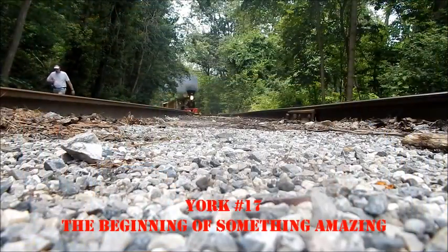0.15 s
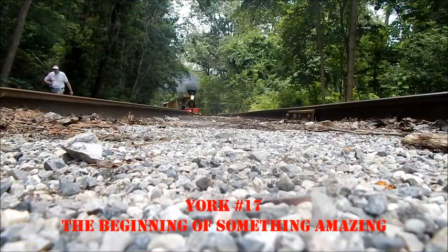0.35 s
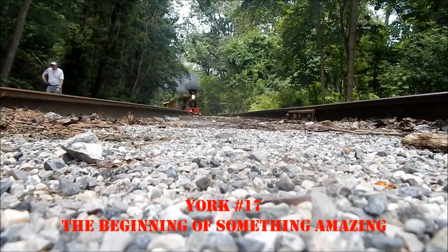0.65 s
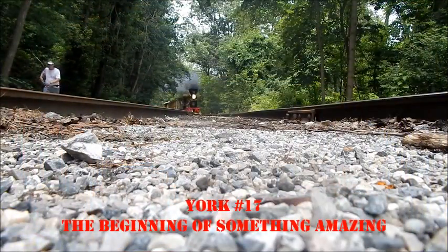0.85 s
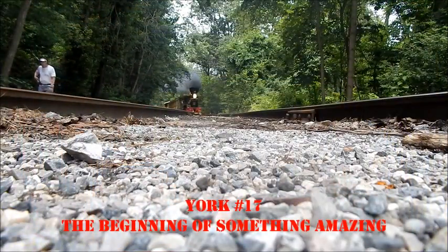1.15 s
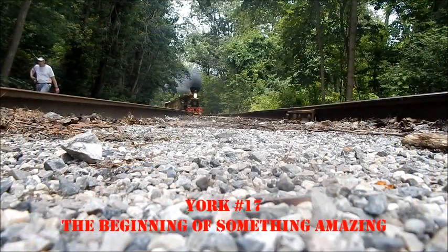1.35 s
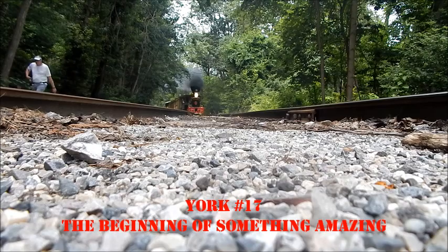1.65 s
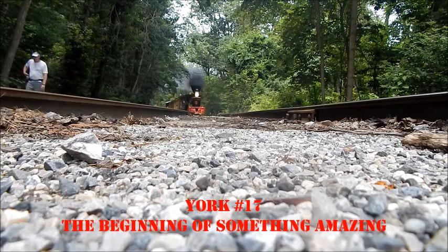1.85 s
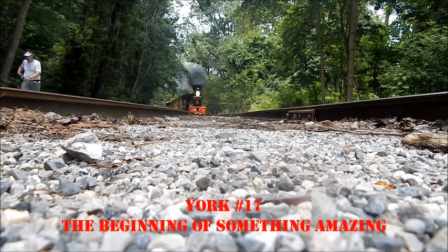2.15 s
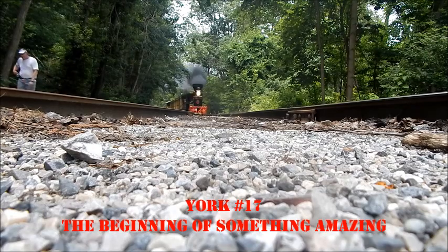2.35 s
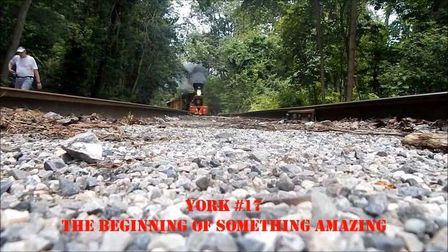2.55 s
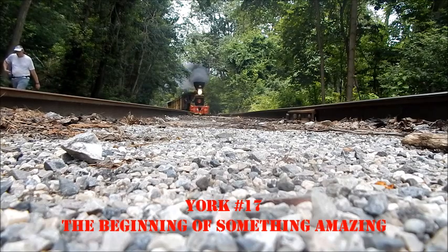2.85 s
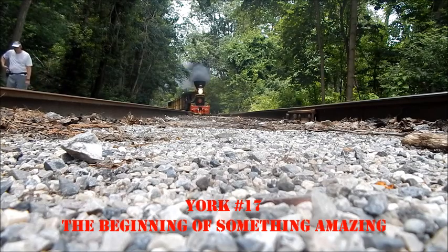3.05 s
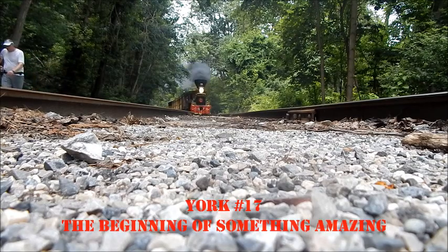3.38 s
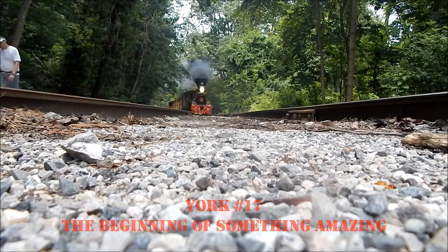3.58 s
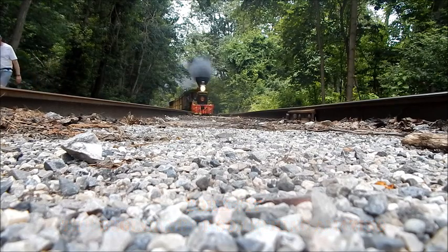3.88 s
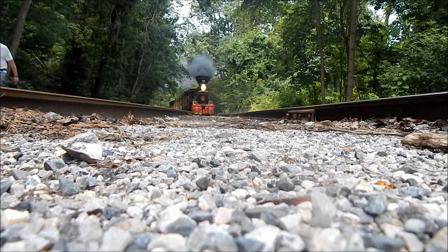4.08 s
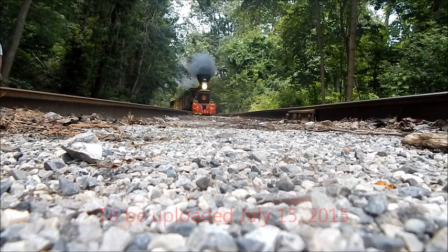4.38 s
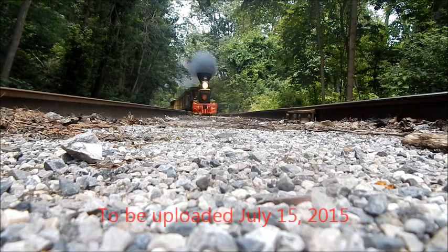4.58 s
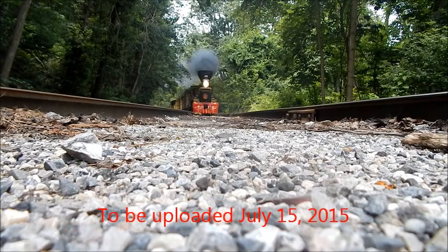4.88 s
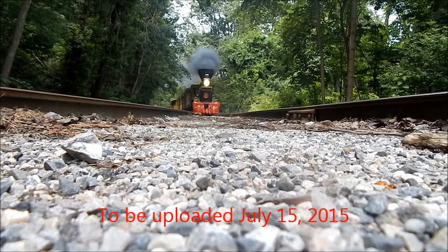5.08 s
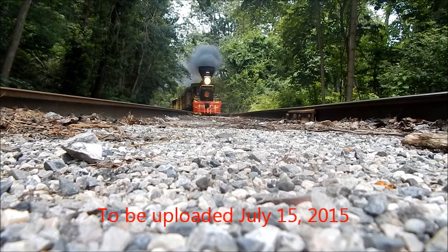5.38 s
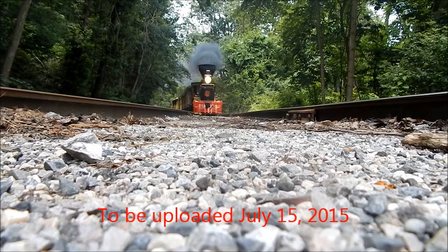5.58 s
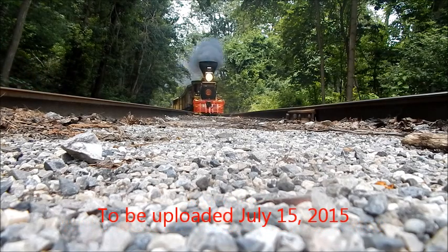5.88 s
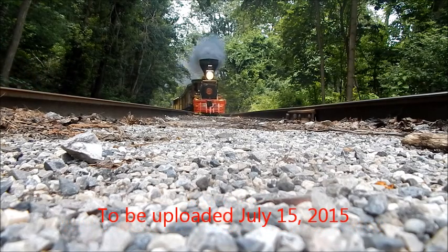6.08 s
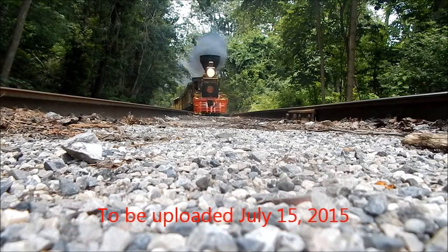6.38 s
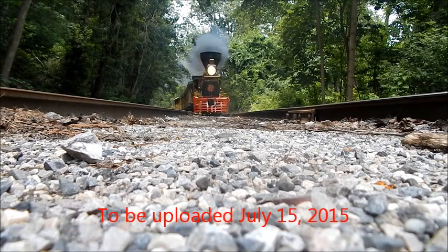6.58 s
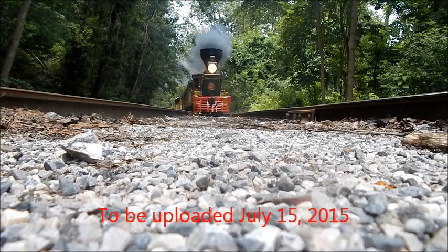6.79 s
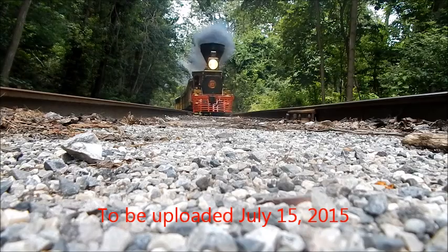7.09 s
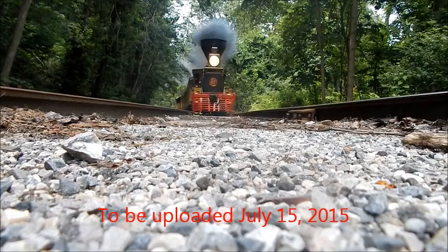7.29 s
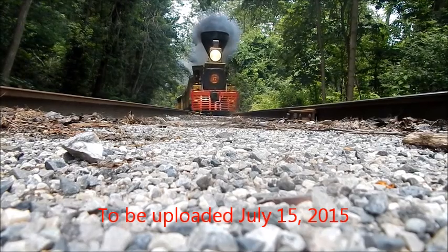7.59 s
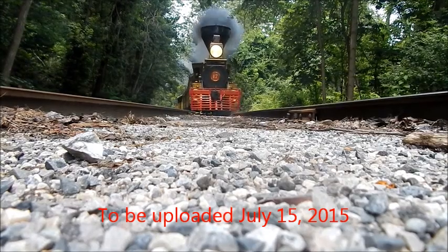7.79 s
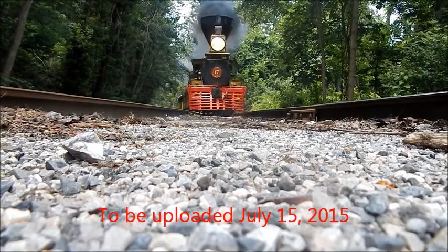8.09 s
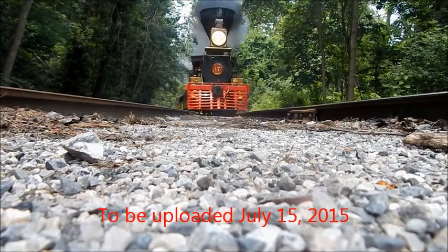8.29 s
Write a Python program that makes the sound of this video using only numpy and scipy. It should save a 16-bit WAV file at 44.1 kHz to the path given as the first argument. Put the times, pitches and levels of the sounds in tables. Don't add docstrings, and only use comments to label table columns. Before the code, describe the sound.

A steam locomotive whistle blows two long, wavering hollow blasts through woods, with steam hiss, a tolling bell and wind buffeting the microphone between them.

```python
import sys
import numpy as np
from scipy import signal
from scipy.io import wavfile
from scipy.ndimage import uniform_filter1d

SR = 44100
rng = np.random.default_rng(int(sys.argv[2]) if len(sys.argv) > 2 else 0)


def invert_db(x):
    u = np.asarray(x, float) / 20
    return 10 ** u


def file_out(sig):
    cols = np.atleast_2d(sig).T
    lim = np.clip(cols, -1, 1)
    pcm = np.round(lim * 32767).astype(np.int16)
    wavfile.write(sys.argv[1], SR, pcm)


N = 372204

# time in seconds, pitch in Hz, first mode in dB.
WHISTLE_PIPE = [(0, 400, -12), (.33, 398, -9.5), (.5, 408.8, -10), (1.6, 413.1, -10.5),
                (2.65, 418.8, -12.5), (2.85, 405, -14.5), (2.96, 429.2, -9.5), (3.1, 415.5, -17),
                (3.37, 388.7, -17.5), (3.44, 414.1, -21), (5.03, 408.5, -32), (5.045, 369.4, -18),
                (5.08, 385.3, -9.5), (5.17, 393, -8.5), (5.21, 413.4, -8.5), (6.3, 417.6, -12),
                (6.6, 413, -12.5), (8.44, 412.7, -19.5)]
# time in seconds, flow as hiss in dB, overblowing as third mode in dB.
VALVE_STEAM = [(0, -52.5, -25.5), (.6, -50.5, -25.5), (1.15, -50.5, -24), (1.9, -53, -27),
               (2.58, -51.5, -22), (2.72, -51.5, -30.5), (2.93, -47, -23.5), (3.1, -48, -26),
               (3.4, -59, -33.5), (4.1, -64, -39.5), (4.95, -57, -50), (5.07, -44, -29.5),
               (5.22, -50.5, -36), (5.35, -52, -25.5), (6.1, -47, -18.5), (6.35, -48, -23.5),
               (6.55, -55, -25), (8.44, -56.5, -30.5)]
# time in seconds, share 0-1.
TREE_SCATTER = [(0, 0.36), (1, 0.25), (2.75, 0.25), (3, 0.39), (3.38, 0.6), (3.5, 1.4), (5.03, 0.8),
                (5.05, .05), (5.5, 0.22), (8.44, 0.15)]
# centre in seconds, width in seconds, depth 0-1.
ECHO_NULLS = [(.098, .014, 0.87), (.27, 0.012, 0.88), (.34, 0.02, 0.85), (0.396, 0.038, 0.96),
              (0.479, 0.022, 0.67), (.66, 0.012, 0.3), (.88, 0.013, 0.8), (.95, 0.011, 0.65),
              (1.022, 0.018, .45), (1.133, 0.016, 0.5), (1.666, 0.024, 0), (1.85, 0.011, 0.23),
              (1.955, 0.022, 0.18), (2.296, 0.021, 0.88), (2.384, .015, 0.83), (2.646, 0.024, 0.43),
              (2.777, 0.0062, 0.5), (2.936, 0.011, 0.87), (3.325, 0.019, 0.7), (3.41, 0.049, 0.92),
              (5.498, 0.037, 0.55), (5.586, 0.029, 0.68), (5.887, 0.045, 0.92), (6.116, 0.024, 0.64),
              (6.562, 0.024, 0.66), (6.718, 0.017, 0.67), (6.796, 0.026, .65), (7.442, 0.033, 0.79),
              (7.555, 0.016, .62), (8.035, 0.035, 0.55)]
# centre in seconds, width in seconds, rise in dB (negative: dip).
ECHO_SWELLS = [(.445, 0.025, 4), (.62, 0.018, 3.5), (1.2, 0.072, 1), (1.42, 0.14, -6), (1.6, 0.029, 9),
               (1.74, 0.047, 3.5), (3.82, 0.06, 8.5), (3.98, 0.021, 8), (4.35, 0.057, 7),
               (4.624, 0.01, 9.5), (5.43, 0.032, 2), (5.71, 0.021, 5), (6.26, 0.034, 2), (6.51, 0.015, 2.5),
               (7.02, .1, 1), (7.39, 0.019, 5), (8.3, 0.054, -1), (3.27, 0.021, 1), (3.5, 0.024, 2.5),
               (3.58, 0.034, 5), (3.72, 0.069, -6), (4.15, 0.085, 5), (2.08, 0.015, -4), (2.03, 0.037, 3),
               (2.72, 0.032, 2), (7.64, 0.014, -3.5), (.79, .04, -4), (6.2, 0.011, -6), (6.45, 0.026, -3.5),
               (8.43, .03, -14)]
# centre in seconds, width in seconds, rise in dB.
SECOND_FLARE = [
    (5.31, 0.098, 13),
]
# centre in seconds, width in seconds, rise in dB.
FIFTH_SETTLING = [
    (2.85, 0.071, 6),
    (5.13, .1, -15),
    (6.75, 0.32, -1.5),
]
# multiple of the pitch, level in dB.
UPPER_PARTIALS = [(5, 3.5), (6, -5.5), (7, -6.5), (8, -11.5), (9, -16.5), (10, -19.5), (11, -22.5)]

# frequency in Hz, density in dB per Hz.
WIND_SPECTRUM = [(20, -8.5), (60, -2), (145, -0.5), (200, -5.5), (400, -11), (600, -13), (900, -38.5),
                 (1500, -32)]
# centre in seconds, width in seconds, rise in dB.
WIND_GUSTS = [(.22, 0.14, 4.5), (.52, 0.036, 7), (.97, .2, 3.5), (2.74, 0.039, 4), (2.93, 0.035, 9.5),
              (3.5, 0.088, 2), (3.85, 0.034, 3), (4.15, 0.049, -7), (4.5, 0.04, -4.5), (4.62, 0.052, 8),
              (4.81, 0.041, 3), (4.97, 0.031, 4), (5.09, .04, -4.5), (5.33, 0.068, 5), (5.72, 0.036, 14),
              (5.91, .04, 12.5), (6.12, 0.075, 7.5), (6.85, 0.052, 2.5), (7.57, 0.028, 5)]
# frequency in Hz, density in dB per Hz.
ROAR_SPECTRUM = [(300, -32), (500, 6), (750, -7.5), (1000, 4), (1400, -2), (2000, -4), (3000, -8),
                 (4500, -19.5), (6000, -26)]
# frequency in Hz, density in dB per Hz.
HISS_SPECTRUM = [(3000, -4.5), (5200, 0), (6500, -1), (9000, -3), (11000, -12), (12500, -14), (14000, -30)]
# frequency in Hz, density in dB per Hz.
JET_SPECTRUM = [(9000, -5), (11000, 4), (13000, -10.5), (14500, -7), (15500, -16), (19000, -35.5)]
# centre in
# seconds, width in seconds, rise in dB (negative: dip).
HISS_SWELLS = [(.59, .05, 2), (.97, .15, 1), (1.52, 0.12, 1.5), (3.85, 0.027, 5.5), (4.1, 0.092, -3),
               (4.26, 0.046, 3), (4.33, .03, -3), (4.41, 0.02, 1.5), (4.5, .04, -7), (4.58, 0.056, 8),
               (5.72, 0.039, 1.5), (6.85, 0.19, 2.5), (7.6, .06, 1)]
# centre in seconds, width in seconds, rise in dB.
VALVE_OPENING = [
    (5.22, 0.14, 9),
    (4.6, 0.17, -5),
]

# start in seconds, blow in dB, extra on the low modes in dB.
BELL_TOLLS = [
    (0.02, -33.5, -5.5),
    (1.27, -29.5, -7),
    (2.329, -36.5, -14),
    (3.387, -26, -5.5),
    (4.53, -25, -6.5),
    (5.661, -22, -3.5),
    (6.749, -26, -3.5),
    (7.659, -25, -8.5),
]
BELL_MODE_HZ = [834, 1012, 1319, 1647, 1680, 2191, 2234, 2304, 2381, 2559, 2859, 2894, 3456, 3516, 3542,
                4334, 4495, 4608, 5593, 5680, 5755, 6051, 6939, 8199, 8974]
# level in dB, 60 dB decay time in seconds.
BELL_MODES = [(-1.5, 2.63), (-2.5, 2.9), (-5.5, 1.8), (-3, 2.4), (0, 2.94), (-9, 0.67), (-8, 2),
              (3.5, 1.65), (-1, 1.5), (1, 1.6), (-8.5, 2.2), (-20.5, 1.5), (-12.5, 1.7), (-9.5, 2),
              (-8.5, 1.8), (-23.5, 1.3), (-16, 2.4), (-12.5, 1.67), (-20.5, 2.2), (-14, 0.99), (-24.5, 2.5),
              (-23.5, 0.88), (-17, 1.1), (-20, 0.95), (-26.5, .6)]
# centre in seconds, width in seconds, rise in dB.
BELL_TURNS = [
    (1.65, .2, -2),
    (5.73, 0.068, 2.5),
    (6.05, 0.34, -4.5),
    (7.2, 0.15, -4),
    (8.0, 0.23, -10.5),
]

# time in seconds, peak in dB, centre in Hz.
PORT_SLAPS = [
    (4.03, -20, 400),
    (4.325, -9.5, 507),
    (4.61, -19, 726),
    (5.03, -24.5, 540),
    (6.31, -25, 585),
    (8.309, -34, 604),
]

# time in seconds, gain in dB.
GAIN_RIDE = [(0, -14), (3.3, -17.5), (3.45, -12.5), (3.8, -6.5), (4.2, 5), (4.5, 9), (4.56, 0.5),
             (4.85, 1.4), (5.09, 10.5), (5.13, 2.5), (5.22, -7), (5.85, -20.5), (6.7, -14.5), (8.44, -23)]
# time in seconds, step in dB.
GAIN_SNAPS = [(.638, -5), (1.227, -4), (1.609, -5), (1.755, -2), (4.412, -3.5), (5.101, -1), (5.206, -4),
              (5.296, 1), (5.38, -1), (5.431, -2), (6.309, 0), (8.32, 1.5)]
# frequency in Hz, left-right likeness 0-1.
PORT_LIKENESS = [(60, 0.94), (180, 1), (550, 0.93), (1650, 0.87), (4970, 0.15), (15000, 0.26)]
# frequency in Hz, left minus right in dB.
PORT_LEAN = [(60, 1), (240, 1.5), (950, 0.5), (3770, -1.0), (15000, 3.5)]

SECONDS = np.arange(N) / SR


def rms_one(x):
    return x / np.sqrt(np.mean(np.abs(x) ** 2) + 1e-20)


def in_time(rows):
    s, *columns = np.transpose(rows)
    return [np.interp(SECONDS, s, c) for c in columns]


def at_hz(points, hz):
    return np.interp(np.log(hz), np.log(np.array(points)[:, 0]), np.array(points)[:, 1])


def bumps(rows):
    return sum(db * np.exp(-((SECONDS - s) / width) ** 2) for s, width, db in rows)


def drift(rate):
    r = np.exp(-80 * np.pi * rate / SR)
    slow = signal.lfilter([1], [1, -2 * r, r * r], rng.standard_normal(N // 40 + 2002))
    slow = rms_one(slow[2000:])
    return np.interp(np.arange(N) / 40, np.arange(len(slow)), slow)


def bandpass(x, order, low, high):
    return signal.sosfilt(signal.butter(order, [low, high], "band", fs=SR, output="sos"), x)


def pair(mid, side, hz):
    alike = np.clip(at_hz(PORT_LIKENESS, hz) * 1.193 - 0.15, 0, 1)
    opposed = side * [[1], [-1]]
    both = np.sqrt((1 + alike) / 2) * mid + np.sqrt((1 - alike) / 2) * opposed
    return both * invert_db(at_hz(PORT_LEAN, hz) / 2 * np.array([[1], [-1]]))


def scatter(width_hz):
    return (drift(width_hz) + 1j * drift(width_hz)) / np.sqrt(2)


def noise(spectrum, band_hz, patchy_db, rate):
    out, together = 0, drift(rate)
    octaves = np.log2(spectrum[-1][0] / spectrum[0][0])
    edges = spectrum[0][0] * 2 ** np.arange(0, octaves, 1 / 3)
    white = rng.standard_normal((2, 2, N))
    for k, (low, high) in enumerate(zip(edges, edges[1:])):
        mid, side = bandpass(white[k % 2], 2, low, high)
        hz = np.sqrt(low * high)
        flicker_db = patchy_db * (0.81 * together + 0.84 * drift(rate))
        out = out + invert_db(at_hz(spectrum, hz) + flicker_db) * pair(mid, side, hz)
    inside = bandpass(out, 3, *band_hz)
    return out / np.sqrt(np.mean(inside ** 2))


def partial(turns, multiple, share, width_hz):
    direct, late = np.sqrt(2) * np.exp(2j * np.pi * multiple * turns)
    share = np.clip(share, 0, 1)
    mid = np.sqrt(1 - share) * direct + np.sqrt(share) * late * scatter(width_hz)
    return pair(np.real(mid), np.real(late * scatter(width_hz)), 415 * multiple)


def pipe_turns(hz):
    memory = np.exp(-1 / (0.15 * SR))
    late_hz = hz[0] + signal.lfilter([1 - memory], [1, -memory], hz - hz[0])
    trembling_hz = hz * (1 + 0.002004 * drift(15) + 0.004 * drift(2.493))
    return np.cumsum([trembling_hz, late_hz], axis=1) / SR


def whistle():
    wander_db, wander_per_s = 1, 5.2
    flutter_db, flutter_per_s = 1.5, 10.3
    hz, first_db = in_time(WHISTLE_PIPE)
    flow_db, third_db = in_time(VALVE_STEAM)
    share, = in_time(TREE_SCATTER)
    turns = pipe_turns(hz)

    second_db = first_db - 28.5 + bumps(SECOND_FLARE) + 1.65 * wander_db * drift(wander_per_s)
    third_db = third_db + wander_db * drift(wander_per_s) + 1.26 * flutter_db * drift(13.4)
    fifth_db = -36.5 + 0.82 * (flow_db + 52) - 1.05 * SECONDS
    fifth_db = fifth_db + bumps(FIFTH_SETTLING) + wander_db * drift(wander_per_s)
    first_db = first_db + bumps(ECHO_SWELLS) + flutter_db * drift(flutter_per_s)
    clear = np.ones(N)
    for s, width, depth in ECHO_NULLS:
        clear *= 1 - np.clip(depth, 0, 1) * np.exp(-((SECONDS - s) / width) ** 2)

    out = clear * invert_db(first_db) * partial(turns, 1, 0.43 * share ** 2, width_hz=9.8)
    out += invert_db(second_db - 3.5) * partial(turns, 2, 0.041 + share, width_hz=10.6)
    out += invert_db(third_db) * partial(turns, 3, 0.1 + share, width_hz=24)
    out += invert_db((third_db + fifth_db) / 2 - 7.5) * partial(turns, 4, 0.37 + share, width_hz=33)
    for multiple, db in UPPER_PARTIALS:
        out += invert_db(fifth_db + db) * partial(turns, multiple, 0.25 + share, width_hz=11.4 * multiple)
    return out


def steam(gain_db):
    flow_db, _ = in_time(VALVE_STEAM)
    engine_db = -54 + gain_db
    hiss_db = 20 * np.log10(np.hypot(invert_db(flow_db), invert_db(engine_db))) + bumps(HISS_SWELLS)
    nearing_db = np.where(flow_db > -60, 1, -0.3) * 1.08 * SECONDS
    jet_db = uniform_filter1d(hiss_db - 12 + nearing_db + bumps(VALVE_OPENING), size=2000)
    roar = invert_db(0.63 * hiss_db - 12.5) * noise(ROAR_SPECTRUM, band_hz=[480, 760], patchy_db=2.5, rate=6.7)
    hiss = invert_db(hiss_db) * noise(HISS_SPECTRUM, band_hz=[7300, 9900], patchy_db=0.2, rate=6)
    jet = invert_db(jet_db) * noise(JET_SPECTRUM, band_hz=[11500, 15000], patchy_db=0.2, rate=6)
    return roar + hiss + jet


def wind(gain_db):
    wind_db = -25 + 0.98 * gain_db + bumps(WIND_GUSTS)
    return invert_db(wind_db) * noise(WIND_SPECTRUM, band_hz=[25, 300], patchy_db=2.0, rate=17)


def bell():
    s, blow_db, low_db = np.transpose(BELL_TOLLS)
    strengths_db = rng.normal(0, 0.78, (len(BELL_TOLLS), len(BELL_MODES)))
    out = 0
    for k, (hz, (level_db, t60)) in enumerate(zip(BELL_MODE_HZ, BELL_MODES)):
        clicks = np.zeros(N)
        clicks[(s * SR).astype(int)] = invert_db(blow_db + level_db + low_db * (hz < 3000) + strengths_db[:, k])
        bloom = SR * (0.013 + 25 / hz)
        swell = signal.lfilter([1], [1, -invert_db(-60 / (t60 * SR))], clicks)
        swell = signal.lfilter([1 / bloom], [1, 1 / bloom - 1], swell)
        carrier = swell * np.exp(2j * np.pi * hz * SECONDS)
        waver_hz = 6 + 0.007 * hz
        mid = np.real(carrier * (0.54 + 0.65 * scatter(waver_hz)))
        side = np.real(carrier * scatter(waver_hz))
        out = out + pair(mid, side, hz)
    return out


def clang():
    blows = np.zeros(N)
    blows[[round(s * SR) for s, *dbs in BELL_TOLLS]] = invert_db(np.array(BELL_TOLLS)[:, 1])
    dying = signal.lfilter([1], [1, -invert_db(-60 / (1.1 * SR))], blows)
    dying = uniform_filter1d(np.roll(dying, 330), size=660)
    bright = bandpass(rng.standard_normal((2, N)), 2, 1800, 8000)
    return dying * signal.lfilter([0.35], [1, -0.65], bright)


def slaps():
    t, out = np.arange(round(0.12 * SR)) / SR, np.zeros(N)
    for s, db, hz in PORT_SLAPS:
        lump = bandpass(rng.standard_normal(len(t)), 3, hz / 1.6, hz * 1.6)
        swell = t / 0.017 * np.exp(1 - t / 0.0086)
        at = round((s - 0.012) * SR)
        out[at:at + len(t)] += invert_db(db) * rms_one(lump) * swell
    return out


def scene():
    gain_db, = in_time(GAIN_RIDE)
    bell_db = gain_db + 7.5 + bumps(BELL_TURNS)
    return whistle() + steam(gain_db) + wind(gain_db) + invert_db(bell_db) * (bell() + clang()) + slaps()


def top_cut(x):
    return signal.sosfilt(signal.butter(12, 15630, fs=SR, output="sos"), x)


def record(dry):
    steps = np.zeros(N)
    steps[[round(s * SR) for s, db in GAIN_SNAPS]] = np.array(GAIN_SNAPS)[:, 1]
    steps = uniform_filter1d(steps, size=40)
    snap_db = signal.lfilter([1], [1, -np.exp(-1 / (0.08 * SR))], steps)
    mix = dry * invert_db(snap_db)
    mix = np.array([mix[0], np.append(mix[1, 0], mix[1, :-1])])
    notch_hz, notch_width_hz = 2505, 70
    for k in (1, 2, 3, 4):
        mix = signal.lfilter(*signal.iirnotch(k * notch_hz, k * notch_hz / notch_width_hz, SR), mix)
    mix = mix / (1 + (mix / 0.72) ** 6) ** (1 / 6)
    return top_cut(mix)


dry = scene()
out = record(dry)
file_out(out)
```